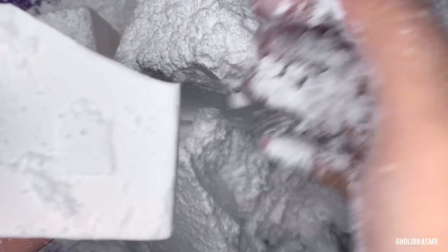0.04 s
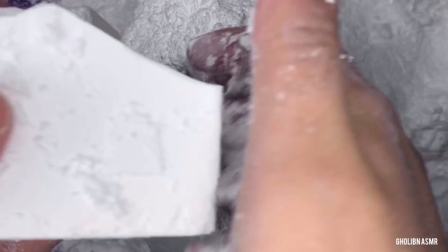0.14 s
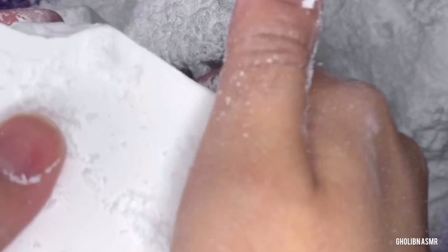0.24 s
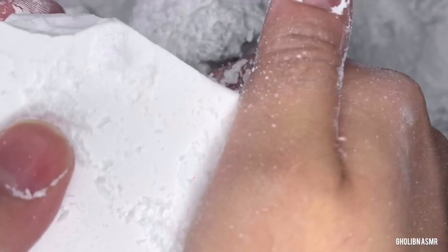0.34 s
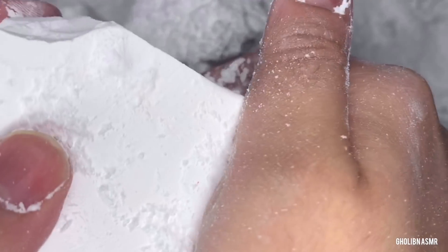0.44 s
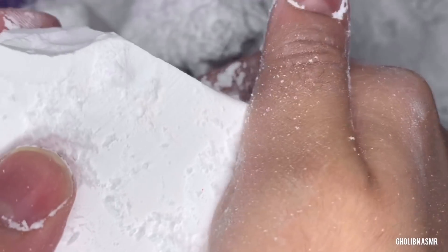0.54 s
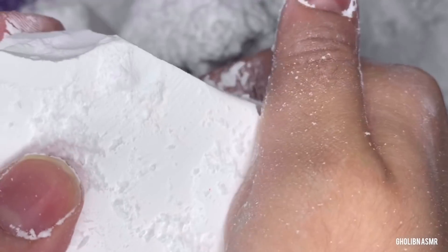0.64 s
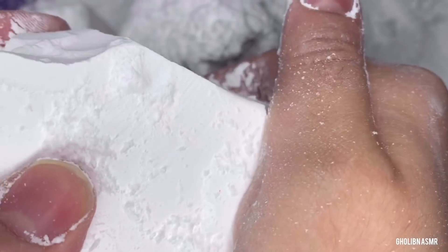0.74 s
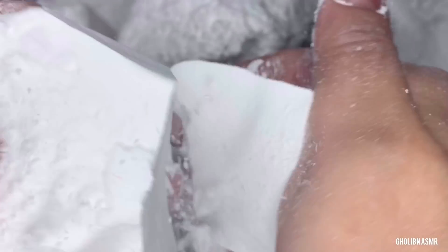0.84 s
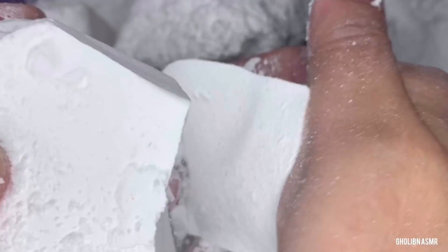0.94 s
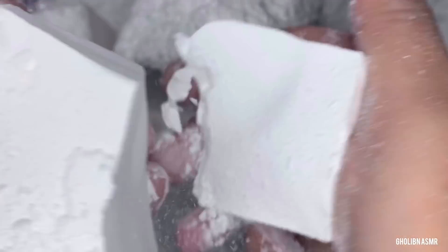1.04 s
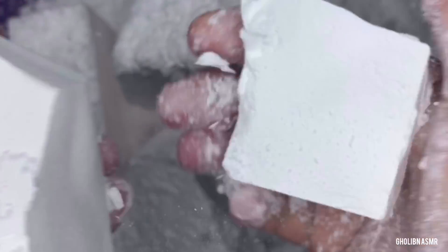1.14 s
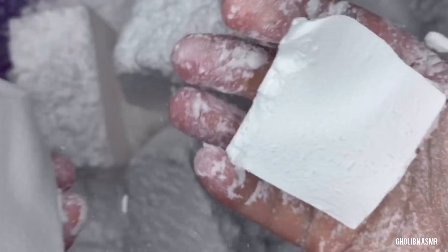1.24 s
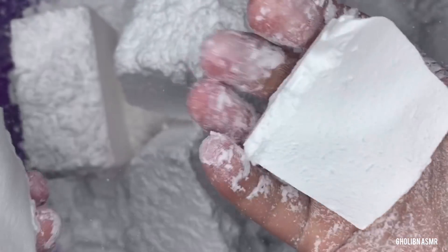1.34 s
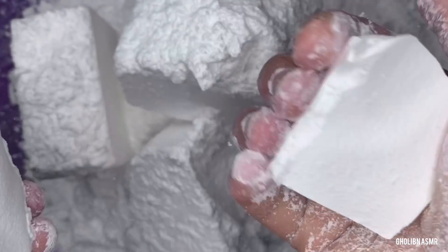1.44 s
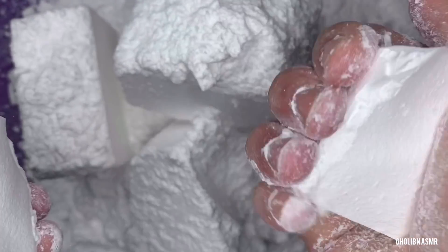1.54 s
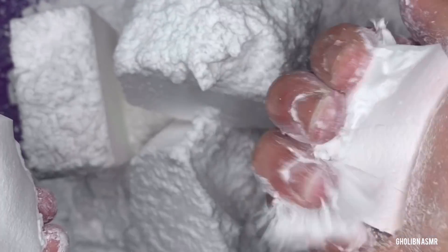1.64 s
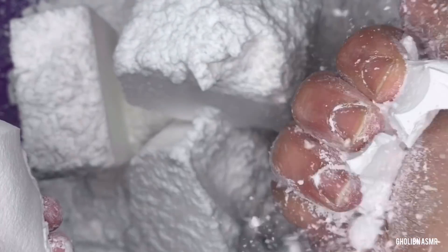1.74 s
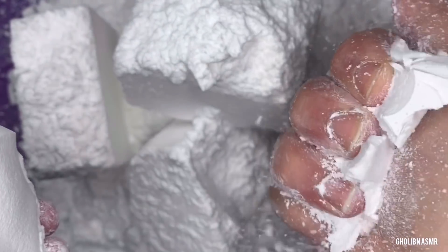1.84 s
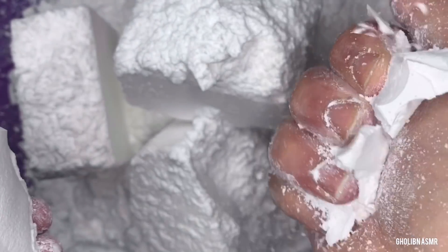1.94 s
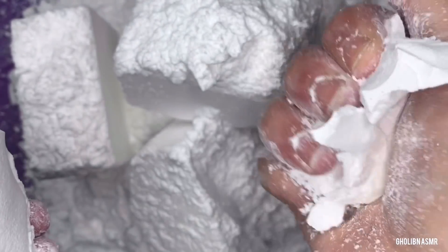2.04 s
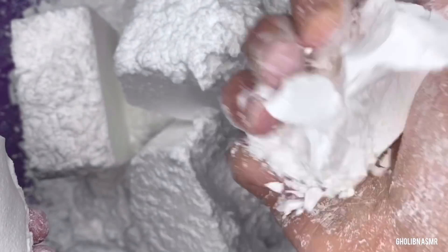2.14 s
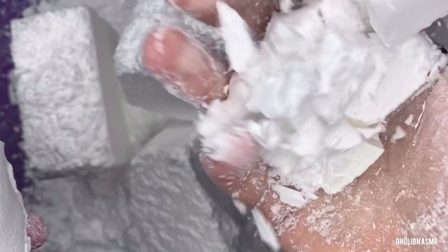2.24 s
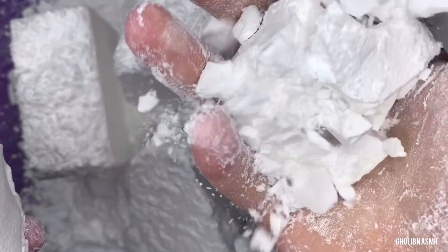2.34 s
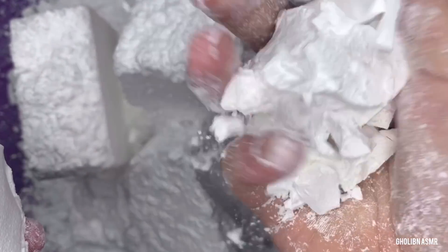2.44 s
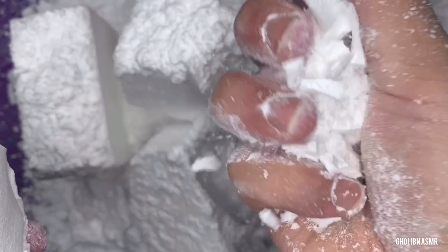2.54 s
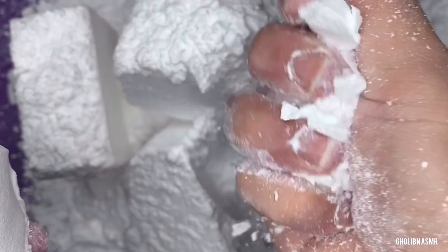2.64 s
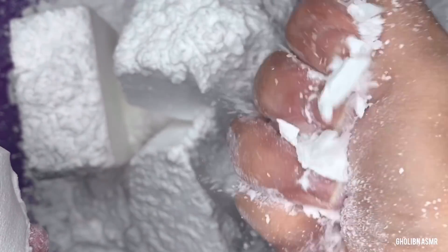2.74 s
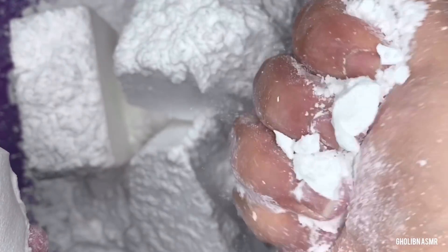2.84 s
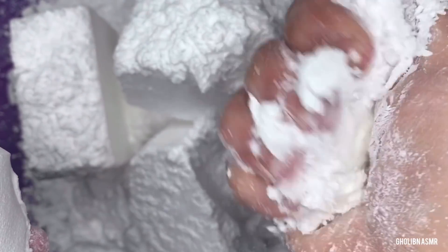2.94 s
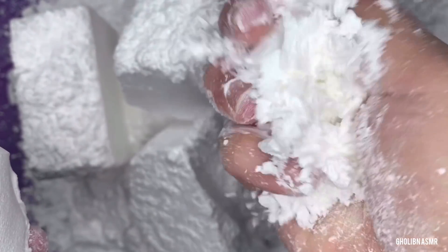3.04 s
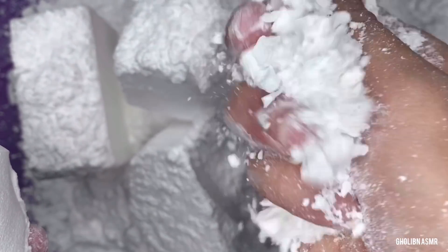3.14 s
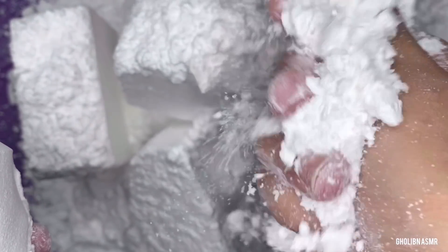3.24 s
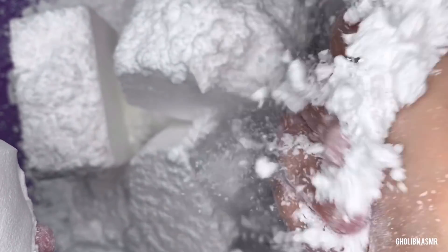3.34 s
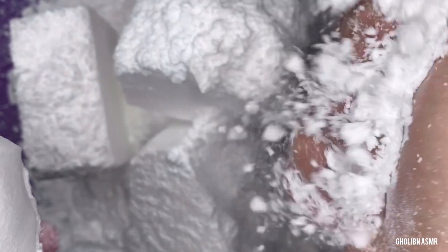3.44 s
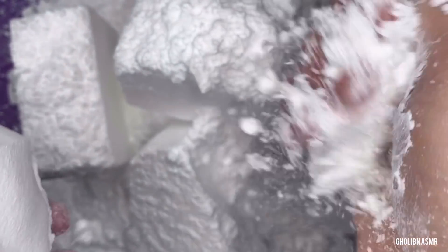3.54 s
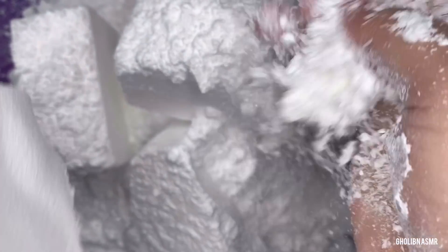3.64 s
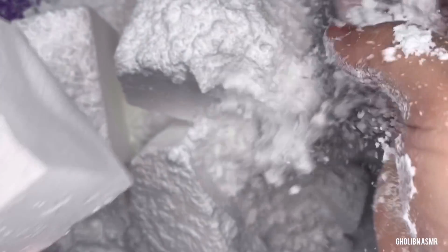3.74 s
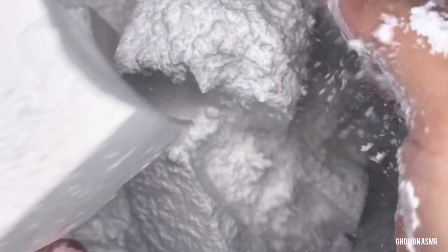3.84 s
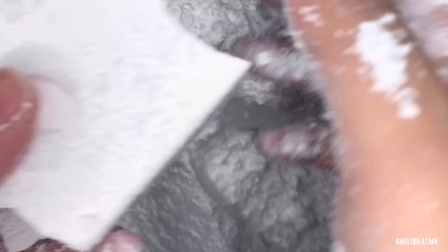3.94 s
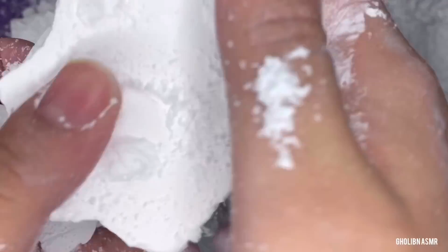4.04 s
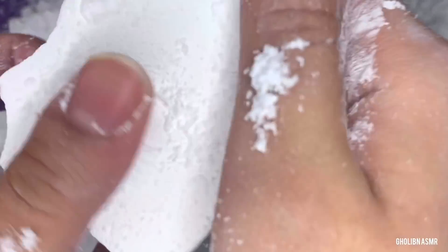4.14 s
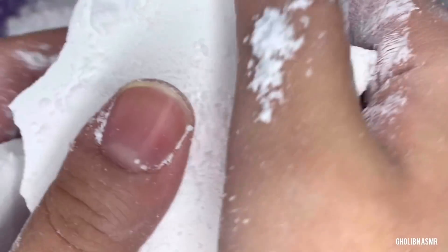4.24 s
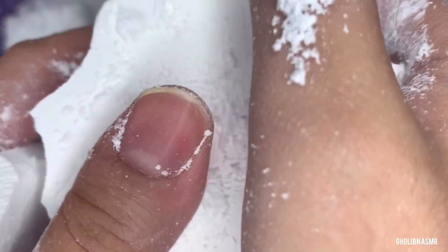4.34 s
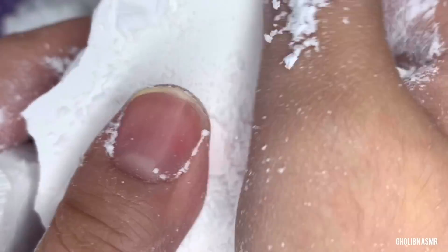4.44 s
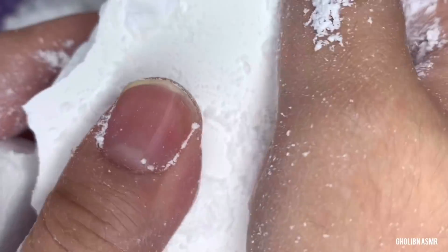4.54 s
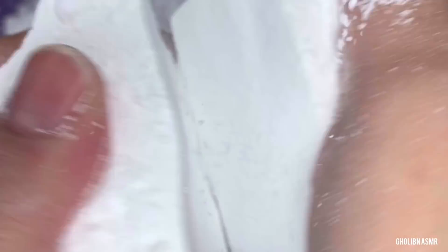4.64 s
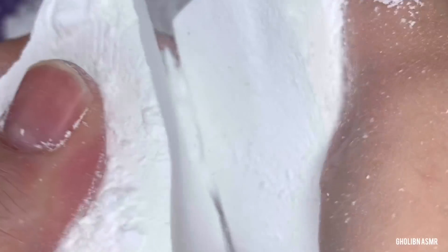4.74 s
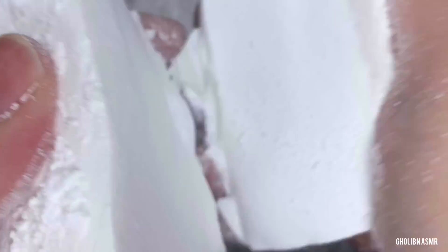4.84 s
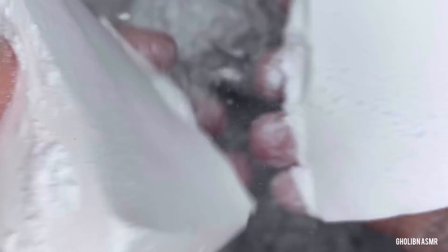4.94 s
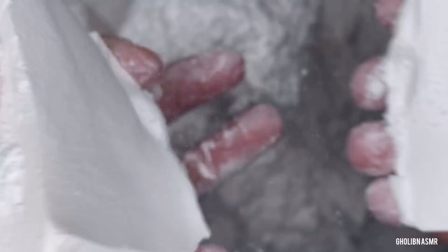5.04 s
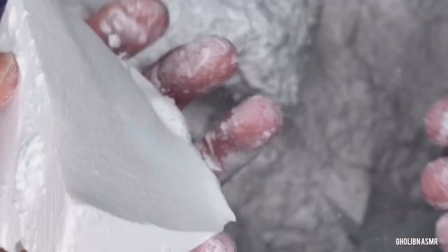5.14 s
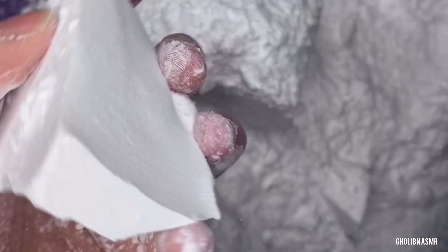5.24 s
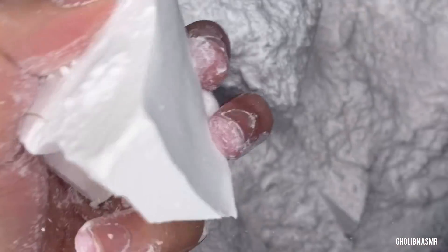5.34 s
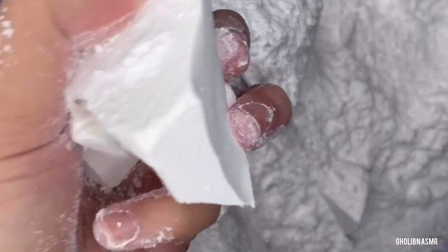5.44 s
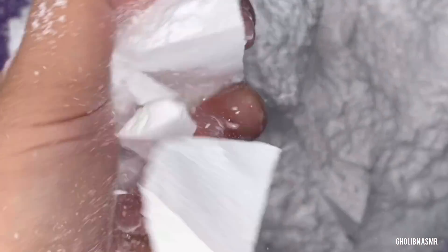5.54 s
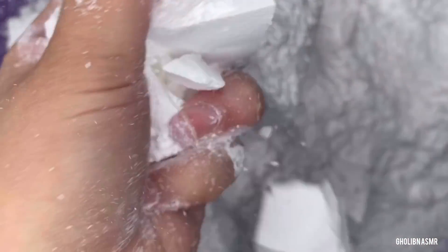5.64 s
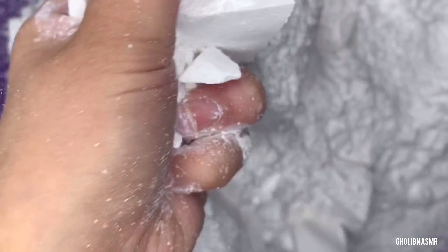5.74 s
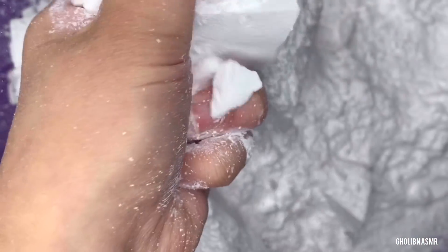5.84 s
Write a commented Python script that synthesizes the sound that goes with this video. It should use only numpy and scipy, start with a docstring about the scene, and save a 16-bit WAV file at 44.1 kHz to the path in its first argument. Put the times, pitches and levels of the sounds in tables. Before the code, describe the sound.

Close-up hands break and crumble gym chalk: crisp irregular snaps, crunchy clusters, dusty rustling over skin, and a few low thuds in a quiet room.

```python
"""Slabs of gym chalk are snapped and crushed by hand close up, heard in stereo in a small quiet room. Three
slabs snap right through with their own resonances; smaller pieces crack, cave in and flake. Each fracture bends
the chalk, so its treble arrives first and its thump last: a very short falling chirp. Between breaks, crumbs
grind, powder slides on skin, hands rumble and bump, and the container booms when knocked. Behind them lie soft
room echoes, still air and a faint machine hum."""
import sys
import numpy as np
from scipy import signal
from scipy.fft import rfft, irfft, next_fast_len
from scipy.io import wavfile
from scipy.ndimage import uniform_filter1d, map_coordinates

SR = 44100
rng = np.random.default_rng(int(sys.argv[2]) if len(sys.argv) > 2 else 0)


def bounce(signal):
    """Save signal as a 16-bit WAV file at the path given by the first command-line argument."""
    frames = np.transpose(np.atleast_2d(signal))
    limited = np.clip(frames, -1, 1)
    pcm = np.round(limited * 32767).astype(np.int16)
    wavfile.write(sys.argv[1], SR, pcm)


N = 259737

# Resonances of three slabs, before a gentle bass cut: (centre [Hz], width [Hz], level [dB])
FIRST_SLAB = [(132, 124, 22), (378, 190, 23.5), (604.5, 150, 22.5), (1545, 440, 23.5), (3600, 4000, 5.5),
              (6470, 1100, 17), (9000, 3200, 6), (14200, 2000, 0.5)]
SECOND_SLAB = [(111.4, 150, 25.3), (383, 395, 25.2), (634, 180, 19.7), (1140, 600, 16.7), (1800, 390, 17.8),
               (4900, 1800, 9.1), (6790, 640, 11.8), (8900, 12000, 3.8), (13500, 1600, 4.2)]
THIN_SLAB = [(119, 250, -2), (2205, 690, 17), (3490, 620, 9), (6600, 2500, 4), (9500, 2500, 3),
             (14400, 3200, 7.5)]
# Whole slabs snapping in two: (time [s], table of resonances)
BREAKS = [(0.7521, FIRST_SLAB), (4.5859, SECOND_SLAB), (5.363, THIN_SLAB)]
# Centres of the thump, knock, crack, snap and fizz bands: (pitch [Hz])
BAND_HZ = [170, 500, 1500, 3800, 9500]
# Single fractures; thud and brightness are bass and treble against the crack itself:
# (time [s], ring of the piece [Hz], strength [dB], thud [dB], brightness [dB])
SNAPS = [(0.042, 2018, -11.5, -2, -51), (0.23, 1870, -7.5, -14, -16), (0.2812, 1146, 6.5, -2, -27),
         (0.366, 1150, -9.5, -6.5, -31), (0.378, 1250, -8.5, -9, -44.5), (0.3957, 1160, -13, -2.5, -39),
         (0.4169, 1160, -12.5, 12, -13), (0.4421, 800, -6, 8.5, -37.5), (0.511, 2120, -2, -20.5, -20.5),
         (0.544, 1200, -4.5, -1, -22), (0.67, 2200, -21.5, -28.5, -24), (0.748, 1830, 9.5, -13, -11),
         (0.8233, 1900, -11.5, 0.5, -7), (1.123, 1830, -16, -15, -24.5), (1.288, 1774, -1.5, 1.5, -22.5),
         (1.441, 2480, -10.5, -40.5, -23.5), (1.484, 2180, -10.5, -31.5, -24.5),
         (1.5125, 2140, 0.5, -22.5, -35), (1.5653, 1630, -9, -10, -3.5), (1.605, 2100, 9, -6, -13),
         (1.6321, 1740, 7, -4, -26), (1.6364, 2240, 14, -13, -18), (1.6419, 1370, 9.5, -2.5, -15),
         (1.645, 1840, 12.5, -10, -23.5), (1.6727, 1700, 5, -6, -13), (1.8169, 1186, 10, 7, -25.5),
         (1.8649, 1910, -6, 5, -7.5), (1.8996, 1780, 2.5, -2, -50.5), (1.9041, 1000, -4, 4, -45),
         (1.9493, 1585, -7.5, 0, -27.5), (2.035, 1125, -22.5, 8.5, -47.5), (2.234, 1180, -12.5, 10, -25),
         (2.408, 1970, -8.5, -18, -20), (2.528, 1780, -9, -3, -42), (2.5575, 1100, -5.5, -8, -29),
         (2.5788, 2500, -3, -3, -4.5), (2.592, 780, -13, 8, -22), (2.603, 1380, -10.5, 11, 12.5),
         (2.613, 1310, -8.5, 3, -11), (2.6238, 1730, -1.5, 2.5, -13), (2.6594, 1170, -6.5, 3, -1.5),
         (2.712, 1890, -10.5, -8, -15), (3.09, 1400, -21.5, 10, 3.5), (3.223, 1590, -8.5, -2, -31.5),
         (3.2556, 1180, -9, -4, -13), (3.3, 1300, -11.5, -4.5, -27), (3.730, 1950, -9.5, -0.5, -13),
         (4.317, 1534, -17, 6, -31.5), (4.43, 1224, -10.5, 20.5, -14.5), (4.435, 2640, -7, 1, 2.5),
         (4.453, 1900, -13.5, 14, -10), (4.4776, 1170, -4.5, 10, -15), (5.3095, 2200, -8.5, -1, -0.5),
         (5.315, 2020, 14, -8.5, -9), (5.3974, 2380, -6, -8, -10), (5.439, 1290, 11.5, 7, -12),
         (5.449, 2050, 19, -18, -14), (5.4883, 2080, 11.5, -17, -17), (5.567, 1010, -13.5, 5, -20),
         (5.59, 1500, -14, -2, -7), (5.6111, 1920, 2.5, -28, -7.5), (5.6383, 1860, 6, -8.5, -20.5),
         (5.6595, 1900, 4, -27, -16), (5.7128, 2100, -26, 2, -10), (5.732, 1300, -10.5, 1, -7),
         (5.772, 2200, -13.5, -7, -4), (5.8004, 1900, 15, -4.5, -10), (5.8204, 1900, -9, 7, 4),
         (5.869, 1900, -5, -1, -15), (5.8857, 2550, 10, 0, -27)]
# Runs of tiny fractures where an edge caves in or scrapes:
# (time [s], length [s], ring of the piece [Hz], strength [dB], thud [dB], brightness [dB])
CRUNCHES = [(0.225, 0.012, 1250, -11, 23, -33), (0.363, 0.05, 1200, -16, 0, -16),
            (0.505, 0.009, 1900, -10, 4, -12.5), (0.527, 0.01, 1770, -2.5, -8, -6.5),
            (0.754, 0.012, 1770, 3.5, 18.5, -4.5), (1.086, 0.011, 1790, -3, -8.5, -16),
            (1.283, 0.011, 1750, -3, 0, -29), (1.556, 0.0065, 1620, -2.5, -26, -13.5),
            (1.613, 0.018, 1690, 10, -7, -9.5), (1.634, 0.013, 1850, 12.5, -3.5, -5.5),
            (1.748, 0.02, 1900, -2.5, -7, -8), (1.819, 0.006, 1170, 3, 9.5, -22.5),
            (1.832, 0.022, 1300, -32, 31, -13), (1.898, 0.023, 1250, -9, 18.5, -40),
            (2.472, 0.02, 1695, -9.5, 5, -5), (2.58, 0.012, 1210, -10, -4, -5.5),
            (2.647, 0.023, 1290, -6.5, 2.5, -16), (2.964, 0.11, 1280, -4, -5.5, -30),
            (3.25, 0.014, 1530, -12, 2.5, -16), (3.324, 0.037, 1810, -13.5, 3.5, -16),
            (4.91, 0.016, 2684, -13.5, -6.5, 14.5), (4.929, 0.01, 1830, -3.5, -12, -9),
            (5.189, 0.007, 2270, -10, -32, -15), (5.249, 0.013, 2390, -20, -36.5, 16.5),
            (5.407, 0.0084, 2000, 0.5, -4, -6), (5.4398, 0.0053, 1740, 12.5, -2.5, 1),
            (5.481, 0.0095, 2370, 13, -8, -14.5), (5.502, 0.0054, 2020, -4.5, 7, -3.5),
            (5.703, 0.013, 1960, -4, 11, -2.5), (5.827, 0.0054, 1830, 3.5, -4, -5),
            (5.835, 0.0103, 2080, 6.5, 0, -4.5), (5.865, 0.0069, 1870, -12, 27, 4)]
# Colour shared by snaps and crunches: (frequency [Hz], gain [dB])
CHALK_COLOUR = [(25, -10.5), (60, -9), (150, -3.5), (300, -6), (550, 1), (850, -3.5), (1400, -8),
                (2000, -5), (3000, -5), (5000, 0), (6600, -1), (8500, -5.5), (10500, -2.5), (14500, -9),
                (16500, -28)]
# Small hard flakes clicking against each other: (time [s], pitch [Hz], level [dB])
FLAKES = [(0.769, 3980, -2.5), (2.971, 1900, -19), (3.033, 1650, -21), (3.26, 3130, -9), (3.34, 1700, -19),
          (3.406, 4560, -13), (3.502, 1700, -17), (3.571, 1970, -12.5), (3.732, 2020, -11.5),
          (4.059, 2400, -26.5), (4.627, 2340, -12), (4.681, 2100, -19), (4.733, 1600, -28.5),
          (5.634, 2000, -3.5), (5.675, 2000, -17), (5.741, 3300, -16)]

# Fingers bear down and grind crumbs: (time of hardest moment [s], level [dB], rise [s], fall [s])
SQUEEZES = [(0.01, -61.5, 0.081, 0.1), (0.25, -58.5, 0.39, 0.36), (0.42, -60, 0.086, 0.11),
            (0.535, -50.5, 0.031, 0.048), (0.79, -49.5, 0.025, 0.11), (0.95, -65, 0.23, 0.24),
            (1.11, -55, 0.1, 0.18), (1.295, -55, 0.032, 0.114), (1.65, -48, 0.22, 0.071),
            (1.85, -54, 0.17, 0.12), (2.10, -59.5, 0.13, 0.11), (2.26, -62, 0.26, 0.35),
            (2.475, -53.5, 0.26, 0.18), (2.61, -50, 0.19, 0.26), (2.83, -60.5, 0.079, 0.58),
            (3.0, -53, 0.15, 0.24), (3.27, -49.5, 0.35, 0.22), (3.58, -52, 0.37, 0.28),
            (3.745, -59, 0.12, 0.46), (4.46, -58.5, 0.016, 0.095), (4.59, -42, 0.019, 0.091),
            (4.87, -63.5, 0.6, 0.54), (5.09, -55.5, 0.021, 0.092), (5.49, -58.5, 0.43, 0.78),
            (5.65, -53, 0.097, 0.18), (5.86, -40.5, 0.093, 0.33)]
# A powdery face is drawn over skin: (time of fastest moment [s], level [dB], rise [s], fall [s])
STROKES = [(0.218, -45.5, 0.075, 0.023), (0.535, -56.5, 0.05, 0.092), (0.81, -52.5, 0.098, 0.05),
           (1.0, -58.5, 0.1, 0.12), (1.085, -47, 0.03, 0.03), (1.18, -56.5, 0.072, 0.087),
           (1.335, -62.5, 0.041, 0.27), (1.77, -55, 0.054, 0.1), (2.13, -71.5, 0.67, 0.26),
           (2.485, -52.5, 0.16, 0.079), (2.66, -50, 0.31, 0.31), (3.33, -54, 0.23, 0.38),
           (3.57, -51, 0.12, 0.24), (3.72, -59.5, 0.22, 1), (4.022, -47, 0.1, 0.05),
           (4.10, -42, 0.069, 0.17), (4.205, -46.5, 0.059, 0.21), (4.435, -46, 0.029, 0.093),
           (4.89, -49, 0.12, 0.11), (5.075, -45, 0.083, 0.095), (5.19, -54.5, 0.12, 0.35),
           (5.51, -44.5, 0.17, 0.11), (5.71, -55.5, 0.089, 0.16), (5.87, -54, 0.2, .2)]
# A hand shifts its grip and the flesh rumbles: (time of firmest moment [s], level [dB], rise [s], fall [s])
GRIPS = [(0.02, -53.5, 0.33, 0.12), (0.255, -50.5, 0.1, 0.18), (0.42, -52, 0.095, 0.15),
         (0.56, -49.5, 0.06, 0.019), (1.655, -47, 0.027, 0.066), (1.86, -46, 0.093, 0.15),
         (4.425, -49.5, 0.041, 0.15), (5.38, -53, 0.14, 0.53), (5.83, -44.5, 0.13, 0.22)]
# Colours of fine crumbs, coarse lumps, sliding powder and rumbling hands: (frequency [Hz], relative level [dB])
CRUMB_COLOUR = [(100, -3.5), (250, -3), (550, -2), (950, 3.5), (1900, 11.5), (3000, 6.5), (4300, -4),
                (5200, -2), (9000, -5), (16000, -30.5)]
LUMP_COLOUR = [(100, -8.5), (250, 0), (550, 2), (1150, 1.5), (1900, -3.5), (3000, -11), (5000, -21.5),
               (9000, -24.5)]
POWDER_COLOUR = [(700, -52.5), (2000, -7.5), (3100, -7), (3600, -2), (4200, 4.5), (5500, 5), (6700, 6),
                 (8500, 2.5), (10500, 3), (13000, 2), (15600, -0.5), (16300, -46.5)]
RUMBLE_COLOUR = [(20, -7), (50, -0.5), (85, 5.5), (125, -2.5), (170, -8.5), (250, -12), (500, -13.5),
                 (1500, -37)]
# The container is knocked and rings with a dull boom: (time [s], pitch [Hz], level [dB], fade by 60 dB [s])
BOOMS = [(1.906, 229, -38.5, 0.05), (5.449, 153, -9.5, 0.014), (5.661, 400, -31, 0.016),
         (5.712, 387, -26.5, 0.025), (5.8025, 212, -8, 0.021)]
# Flesh bumping the chalk with a soft low thump: (time [s], pitch [Hz], level [dB], fade by 60 dB [s])
BUMPS = [(0.249, 59, -29.5, 0.064), (4.011, 62, -41, 0.059), (4.409, 89, -41, 0.078)]

# Phase difference between the two microphone ports: (frequency [Hz], left ahead of right [rad])
LEFT_LEAD = [(0, 0), (300, -.4), (1000, -.35), (2100, .3), (2900, 1.4), (3600, 1.2), (4500, 2.1),
             (5350, 3.14), (7000, 5.4), (7700, 6.2), (9200, 6.4), (10300, 8.3), (11200, 9.2), (12400, 9.7),
             (13500, 11.4), (16000, 13)]
# Level difference between the ports: (frequency [Hz], left minus right [dB])
LEFT_FAVOUR = [(100, -1.1), (1200, 1.5), (2000, -1), (3000, -5.5), (4200, 0.5), (6000, -0.5)]
# How long the room rings: (frequency [Hz], fade by 60 dB [s])
ROOM_FADE = [(100, 0.46), (350, 0.66), (900, 0.064), (2000, 0.39), (6000, 0.14), (15000, 0.18)]
# How strongly the room answers: (frequency [Hz], level [dB])
ECHO_LEVEL = [(60, -43), (150, -8.5), (350, -13.5), (550, -20.5), (900, -10.5), (1900, -23.5),
              (4000, -11.5), (8000, -20.5), (15000, -20)]
# Colour of the still air: (frequency [Hz], relative level [dB])
AIR_COLOUR = [(25, -36), (55, 10), (110, 15), (200, 7.5), (700, -11.5), (1900, -4), (3500, -15.5),
              (15000, -34.5)]
# Faint machine hum: (pitch [Hz], level [dB])
HUM = [(55, -69.5), (109, -68), (163, -79)]

PIECE = 8192  # samples in one fracture
SPLIT_S = .0008  # time that a crack takes to run through a slab
TOP_HZ = 16700  # nothing is kept from here up
# The knock takes a share of the thud, the snap a share of the brightness.
KNOCK_SHARE, KNOCK_DB, SNAP_SHARE, SNAP_DB = 1, -4.5, 0.48, -6
KNOCK_MOST_DB = 5  # most that the knock may stand above the crack
# One rise before its peak, or one fall after it, a move is this far down; shape above 1 rounds the peak.
SWELL_DB, SWELL_SHAPE = 22.5, 1.3
SHED_DB, LOOSEN_DB = -6.5, -24  # powder shed by a squeeze, crumbs loosened by a stroke
REST_POWDER_DB, REST_CRUMBS_DB, REST_RUMBLE_DB = -77, -83, -66.5  # hands that merely hold the chalk
# Shares of lumps and crumbs, and the squeeze level at which firmness is halfway.
LUMPS_DB, CRUMBS_DB, YIELD_DB = -4, -3, -56
FEW_PER_S, MANY_PER_S = 160, 2200  # crumbs that break under a light touch and under a firm squeeze


def breaks(between_db=2, top_hz=11000, lowest_hz=28):
    """One clean fracture right through a slab sets all its resonances going."""
    track = np.zeros(N)
    hz = np.fft.rfftfreq(PIECE, 1 / SR)
    bass_cut = np.hypot(hz, lowest_hz / 2) / np.hypot(hz, 2 * lowest_hz)
    for s, resonances in BREAKS:
        power = amp(between_db) ** 2 * np.exp(-(hz / top_hz) ** 2) / 2  # fills the gaps between resonances
        for centre, width, db in resonances:
            power = power + amp(db) ** 2 * .5 ** ((2 * (hz - centre) / width) ** 2)
        force = fracture(splinter=0.35, dust=0.27, dust_s=0.007, strain=0.07, strain_s=0.0036)
        add(track, s - PIECE // 8 / SR, radiated(force, np.sqrt(power) * bass_cut))
    return track


def snaps(onset_s=0.0004):
    """Single fractures, starting just ahead of their peak, each coloured by the piece that gives way."""
    track = np.zeros(N)
    for s, ring_hz, strength_db, thud_db, bright_db in SNAPS:
        force = fracture(splinter=0.55, dust=0.42, dust_s=0.003, strain=0.09, strain_s=0.0036)
        sound = slab(force, ring_hz, balance(strength_db, thud_db, bright_db))
        add(track, s - onset_s - PIECE // 8 / SR, sound)
    return track


def crunches(rise_s=0.00014, fall_s=0.0028):
    """An avalanche of small breaks that comes in clumps while the edge gives way."""
    track = np.zeros(N)
    t = np.arange(PIECE // 2) / SR
    for s, length, ring_hz, strength_db, thud_db, bright_db in CRUNCHES:
        crush = (1 - np.exp(-t / rise_s)) * np.exp(-np.maximum(t - length, 0) / fall_s)
        clumps = amp(3 * map_coordinates(rng.standard_normal(size=64), [t * 500]))
        force = crush * clumps * grains(len(t), rate=5000, spread_db=6)
        sound = slab(force, ring_hz, balance(strength_db, thud_db, bright_db))
        add(track, s - PIECE // 8 / SR, sound)
    return track


def flakes(chatter_s=0.0022, octaves=0.66, skirt_db=-20):
    """A flake chatters for a few milliseconds, at the pitch of its own size."""
    track = np.zeros(N)
    t = np.arange(PIECE) / SR
    hz = np.fft.rfftfreq(PIECE, 1 / SR)
    for s, pitch_hz, level_db in FLAKES:
        chatter = np.exp(-(t / chatter_s - 1) ** 2 * 2)
        force = grains(PIECE, rate=7000, spread_db=4) * chatter
        away = np.log2((hz + 1) / pitch_hz)  # octaves from the pitch
        gain = np.exp(-(away / octaves) ** 2) + amp(skirt_db) / (1 + away ** 2)
        add(track, s - chatter_s - PIECE // 8 / SR, radiated(force, amp(level_db) * gain))
    return track


def fracture(splinter, dust, dust_s, strain, strain_s):
    """The chalk crackles under strain, breaks with a burst of splinters and leaves a short trail of dust."""
    t = np.arange(PIECE) / SR
    burst = grains(PIECE, rate=SR, spread_db=7.0) * np.exp(-t / SPLIT_S)
    trail = grains(PIECE, rate=6000, spread_db=6) * np.exp(-t / dust_s)
    # The creak sits at the end and wraps round to just before the break.
    creak = grains(PIECE, rate=2300, spread_db=5.5) * np.exp(-t[::-1] / strain_s)
    parts = [(splinter, burst), (dust, trail), (strain, creak)]
    debris = sum(size * part / np.linalg.norm(part) for size, part in parts)
    # Fragments are too small to radiate bass.
    force = signal.lfilter(*signal.butter(1, 1500, "high", fs=SR), debris)
    force[0] += 1  # the break itself
    return force


def balance(strength_db, thud_db, bright_db):
    """Levels of thump, knock, crack, snap and fizz: a heavy break lifts the bass, a clean one the treble."""
    knock_db = min(KNOCK_SHARE * thud_db + KNOCK_DB, KNOCK_MOST_DB)
    snap_db = SNAP_SHARE * bright_db + SNAP_DB
    return strength_db + np.array([thud_db, knock_db, 0, snap_db, bright_db])


def slab(force, ring_hz, levels_db, ring_db=8.0, ring_octaves=0.19, hollow_db=4, hollow_ratio=0.42,
         uneven_db=3.0):
    """One piece of chalk has a damped resonance, a hollow below it, and ripples set by its chance shape."""
    hz = np.fft.rfftfreq(PIECE, 1 / SR)

    def bump(centre):
        """A smooth hill around one pitch."""
        return np.exp(-(np.log2((hz + 1) / centre) / ring_octaves) ** 2)

    ring = ring_db * bump(ring_hz) - hollow_db * bump(hollow_ratio * ring_hz)
    uneven = uneven_db * ripple(hz, spacing_hz=254.6)
    bands = along(list(zip(BAND_HZ, levels_db)), hz)
    return radiated(force, amp(bands + along(CHALK_COLOUR, hz) + ring + uneven))


def ripple(hz, spacing_hz):
    """A smooth random curve of frequency."""
    return map_coordinates(rng.standard_normal(size=400), [hz / spacing_hz], mode="mirror")


def radiated(force, gain):
    """A force heard through chalk: the gain sets the energy of each broad band, the force only the fine grain."""
    push = rfft(force, PIECE)
    energy = uniform_filter1d(np.abs(push) ** 2, size=281, mode="mirror")
    share = np.sqrt(np.abs(energy) + 1e-12)
    heard = push / share * causal(gain) * bending(np.fft.rfftfreq(PIECE, 1 / SR))
    return np.roll(irfft(heard), PIECE // 8)  # makes room for the creak ahead of the break


def causal(gain):
    """A response with this gain that rings only after it is struck."""
    cepstrum = irfft(np.log(np.maximum(gain, 1e-6)))
    half = len(cepstrum) // 2
    fold = np.r_[1, np.full(half - 1, 2), 1, np.zeros(half - 1)]  # moves all ringing after the strike
    return np.exp(rfft(cepstrum * fold))


def bending(hz, lag_s=0.000969, bend=0.916, lowest_hz=40):
    """Response of a slab in which low bending waves travel slowest."""
    delay = lag_s * (BAND_HZ[2] / (hz + lowest_hz)) ** bend
    return np.exp(-2j * np.pi * np.cumsum(delay) * hz[1])


def hands():
    """Squeezes break crumbs and lumps in fits and starts, strokes hiss with powder, and grips rumble."""
    squeeze, stroke = effort(SQUEEZES), effort(STROKES)
    firm = squeeze / (squeeze + amp(YIELD_DB) ** 2)  # 0 is light, 1 is firm
    rate = FEW_PER_S + (MANY_PER_S - FEW_PER_S) * firm
    fits = amp(2.2 * wobble(55))

    fine = unit(grains(N, rate=rate, spread_db=4.5) / np.sqrt(rate))
    crumbling = filtered(fits * (fine + chips() / 2), bending)
    crumbs = coloured(cupped(crumbling, depth_db=1.5), CRUMB_COLOUR)
    lumps = coloured(filtered(fits * grains(N, rate=650, spread_db=5), bending), LUMP_COLOUR)
    friction = grains(N, rate=7000, spread_db=3.5) * amp(1.3 * wobble(90))
    powder = coloured(cupped(friction, depth_db=3.0), POWDER_COLOUR)
    rumble = coloured(rng.standard_normal(N), RUMBLE_COLOUR)

    grind = np.sqrt(squeeze + amp(LOOSEN_DB) ** 2 * stroke + amp(REST_CRUMBS_DB) ** 2)
    slide = np.sqrt(stroke + amp(SHED_DB) ** 2 * squeeze + amp(REST_POWDER_DB) ** 2)
    grip = np.sqrt(effort(GRIPS) + amp(REST_RUMBLE_DB) ** 2)
    crush = np.sqrt(firm * squeeze)  # lumps give way mostly under a firm squeeze
    broken = amp(CRUMBS_DB) * grind * crumbs + amp(LUMPS_DB) * crush * lumps
    return grip * rumble + broken + slide * powder


def effort(moves):
    """Power of a series of hand moves, each swelling to its peak and dying away."""
    t, power = np.arange(N) / SR, np.zeros(N)
    for s, peak_db, rise_s, fall_s in moves:
        away = np.maximum((s - t) / rise_s, (t - s) / fall_s)
        near = away < 4
        power[near] += amp(peak_db - SWELL_DB * np.abs(away[near]) ** SWELL_SHAPE) ** 2
    return power


def chips(centre_hz=1500, octaves=1.0, cycles=0.88, count=6000):
    """Coarse crumbs burst at random, each ticking briefly at the pitch of its own size."""
    starts = rng.integers(0, N, count)
    pitch, size = np.clip(rng.standard_normal((2, count)), -2, 2)
    hz = centre_hz * 2 ** (octaves * pitch[:, None])
    n = np.arange(PIECE // 48)
    fade = np.exp(-hz * n / SR / cycles)
    ticks = amp(3.5 * size[:, None]) * np.sin(2 * np.pi * hz * n / SR) * fade * hz
    return unit(np.bincount((starts[:, None] + n).ravel(), ticks.ravel(), N)[:N])


def cupped(x, depth_db, size=(6, 17)):
    """The hollow of the moving hand favours a few shifting pitches."""
    z = signal.stft(x, nperseg=512)[2]
    # Random levels are smoothed over pitch, then over time.
    field = uniform_filter1d(rng.standard_normal(z.shape), size[0], 0)
    field = uniform_filter1d(field, size[1], 1)
    return signal.istft(z * amp(depth_db * unit(field)), nperseg=512)[1][:N]


def thuds(rows, attack_s):
    """A knock or bump rings for a few cycles at its own pitch."""
    track = np.zeros(N)
    t = np.arange(PIECE) / SR
    for s, hz, peak_db, t60 in rows:
        envelope = amp(peak_db - 60 * t / t60) * (1 - np.exp(-t / attack_s))
        add(track, s, envelope * np.sin(2 * np.pi * hz * t))
    return track


def ports(x):
    """Two ports differ in phase and level, and nearby blocks scatter treble differently to each."""
    scatter, scatter_s = .22, .0009
    t = np.arange(SR // 80) / SR
    echoes = rng.standard_normal((2, len(t))) * t * np.exp(-t / scatter_s)
    echoes = signal.lfilter(*signal.butter(2, 1800, "high", fs=SR), echoes)
    echoes = echoes / np.linalg.norm(echoes[0])
    pair = x + scatter * signal.fftconvolve(x[None], echoes, axes=1)[:, :N]
    half = np.array([[.5], [-.5]])  # each port takes half the difference

    def difference(hz):
        """Level and phase of each port."""
        lead = np.interp(hz, *np.transpose(LEFT_LEAD))
        return amp(half * along(LEFT_FAVOUR, hz)) * np.exp(1j * half * lead)

    return filtered(pair, difference)


def room(x, width=0.42, gap_s=0.0075):
    """The walls answer softly, longest in the low middle, and a little differently at each port."""
    hz, t, z = signal.stft(rng.standard_normal((2, SR * 3 // 4)), SR, nperseg=256)
    t60 = along(ROOM_FADE, hz)[:, None]
    decay = amp(-60 * t / t60) * np.sqrt(2 * np.log(1000) / (t60 * SR))  # equal energy for any length
    level = amp(along(ECHO_LEVEL, hz))[:, None]
    mid, side = signal.istft(z * decay * level, SR, nperseg=256)[1]
    tails = np.pad([mid + width * side, mid - width * side], [(0, 0), (round(gap_s * SR), 0)])
    return signal.fftconvolve(x, tails, axes=1)[:, :N]


def hum(waver_db=2.5, drift=0.66):
    """A far machine hums low and not quite steadily, wavering in level and phase (drift [rad])."""
    t = np.arange(N) / SR
    total = np.zeros(N)
    for hz, db in HUM:
        level = amp(db + waver_db * wobble(16)) * np.sqrt(2)
        total += level * np.sin(2 * np.pi * hz * t + drift * wobble(9.3))
    return total


def amp(db):
    """Decibels to gain."""
    return 10 ** (np.asarray(db) / 20)


def unit(x):
    """Scale to rms 1."""
    return x / np.sqrt(np.mean(x ** 2) + 1e-20)


def along(points, hz):
    """Read (frequency [Hz], value) points on a log frequency axis."""
    f, v = np.transpose(points)
    return np.interp(np.log(hz + 1), np.log(f + 1), v)


def wobble(rate):
    """A smooth random curve through rate random points a second."""
    return map_coordinates(rng.standard_normal(int(N * rate / SR) + 4), [np.arange(N) * rate / SR])


def grains(size, rate, spread_db):
    """Random tiny breaks, rate a second, of uneven strength and either sign."""
    chance, sizes, signs = rng.random(size), rng.standard_normal(size), rng.standard_normal(size)
    return (chance < rate / SR) * np.sign(signs) * amp(spread_db * np.clip(sizes, -2, 2))


def filtered(x, response):
    """Pass x through a complex response of frequency."""
    m = next_fast_len(N + SR // 2)
    return irfft(rfft(x, m) * response(np.fft.rfftfreq(m, 1 / SR)), m)[..., :N]


def coloured(x, spectrum):
    """Shape x by a spectrum, at rms 1."""
    return unit(filtered(x, lambda hz: amp(along(spectrum, hz))))


def add(track, s, sound):
    """Mix a sound into the track from time s, or from the very start if s is negative."""
    part = track[max(0, round(s * SR)):][:len(sound)]
    part += sound[:len(part)]


def scene(snap_db=0, crunch_db=0, air_db=-70, spill_db=-16):
    """Fractures and hands close up, more hand sounds out to the sides, over the room, air and hum."""
    fractures = ports(breaks()) + ports(amp(snap_db) * snaps())
    edges = ports(amp(crunch_db) * crunches() + flakes())
    knocks = thuds(BOOMS, attack_s=0.0019) + thuds(BUMPS, attack_s=0.004)
    air = amp(air_db) * coloured(rng.standard_normal(N), AIR_COLOUR) + hum()
    near = fractures + edges + ports(hands() + knocks + air)
    spill = amp(spill_db) * hands()  # opposite in the two ports, so it spreads wide
    return near + np.array([spill, -spill]) + room(near)


def record(dry):
    """Only sound below the band limit is kept."""
    return filtered(dry, lambda hz: hz < TOP_HZ)


dry = scene()
out = record(dry)
bounce(out)
```